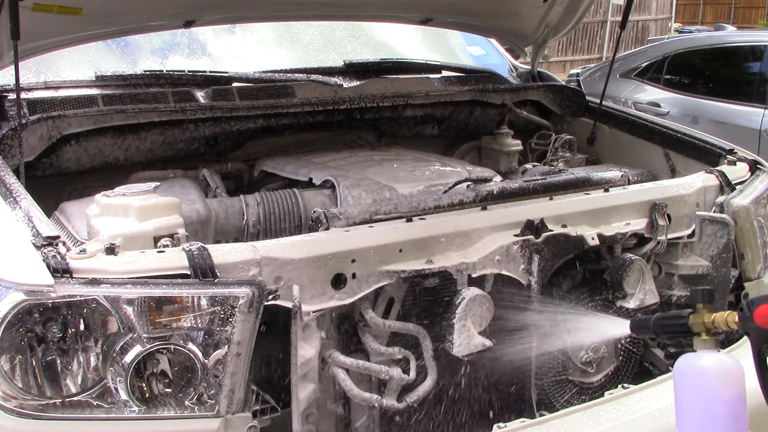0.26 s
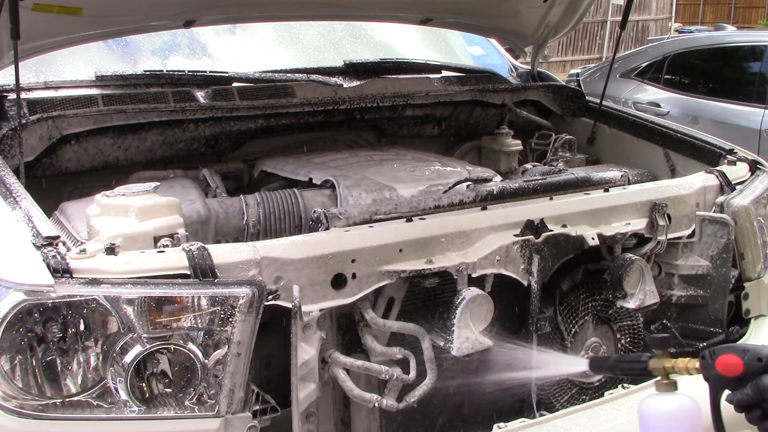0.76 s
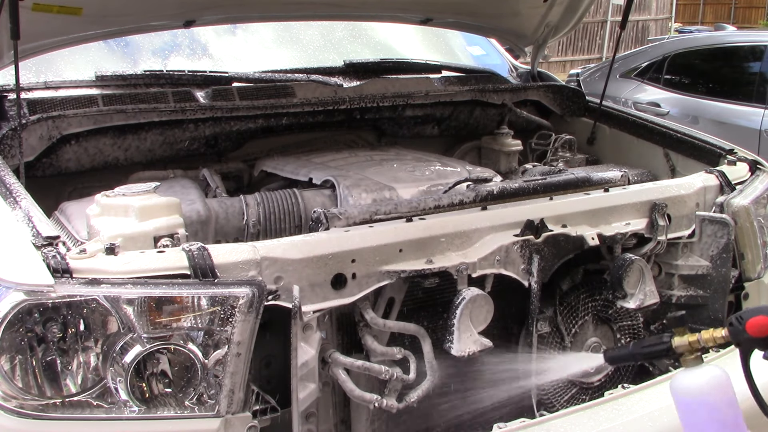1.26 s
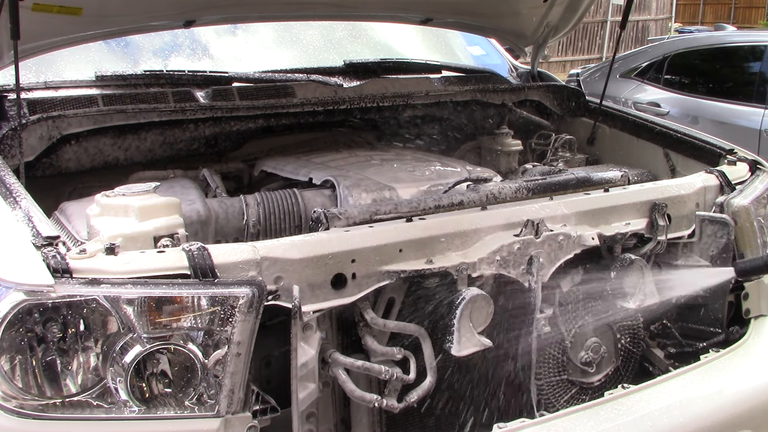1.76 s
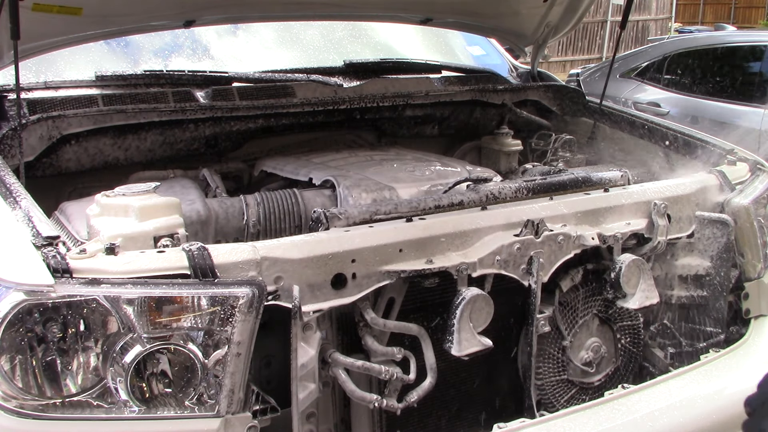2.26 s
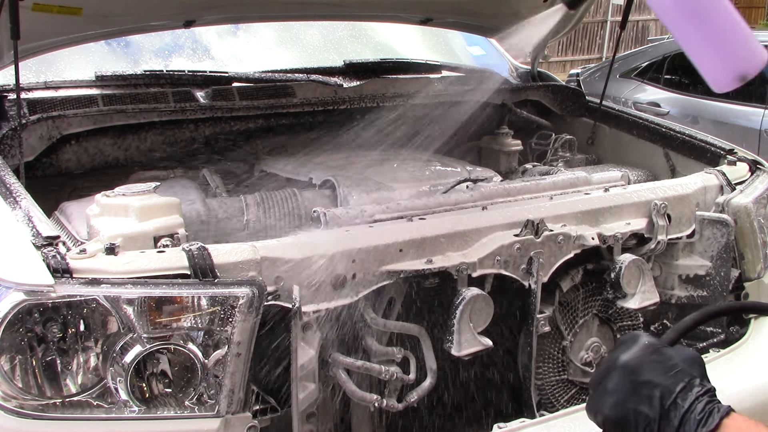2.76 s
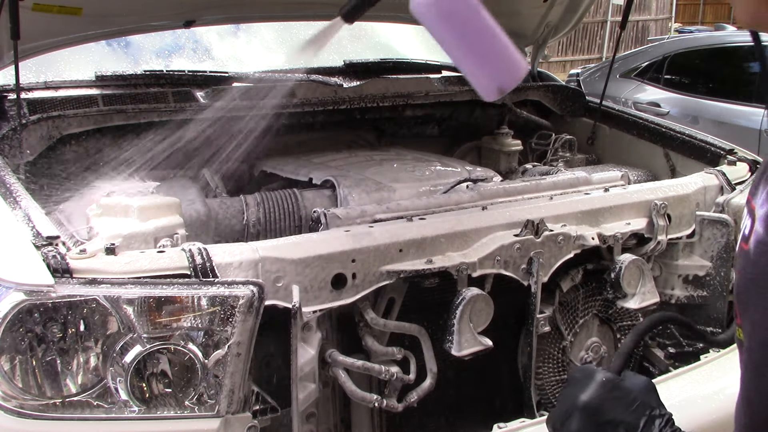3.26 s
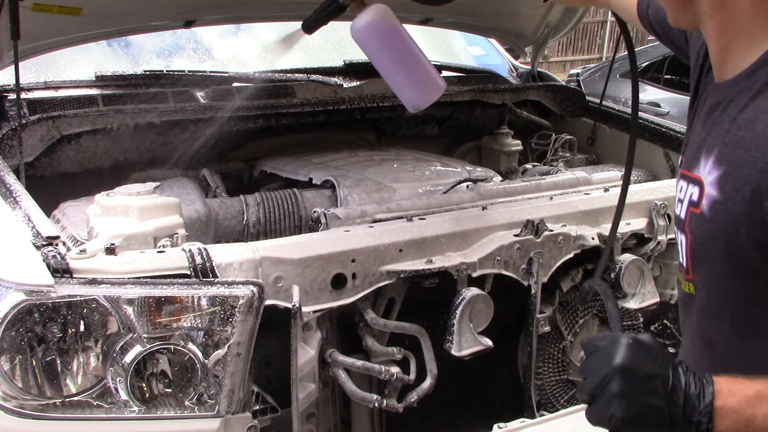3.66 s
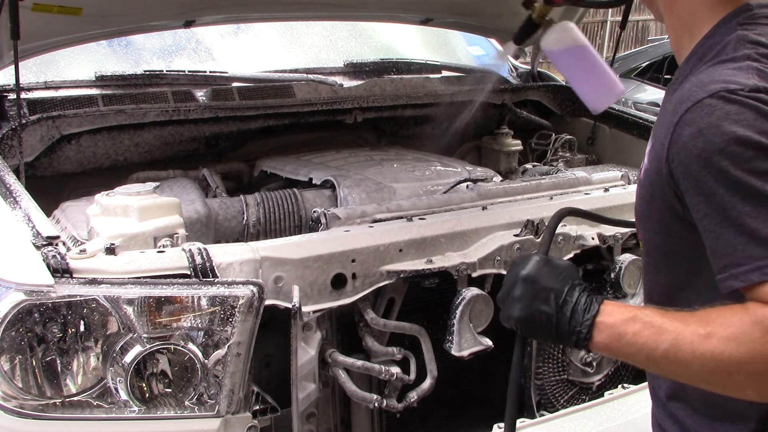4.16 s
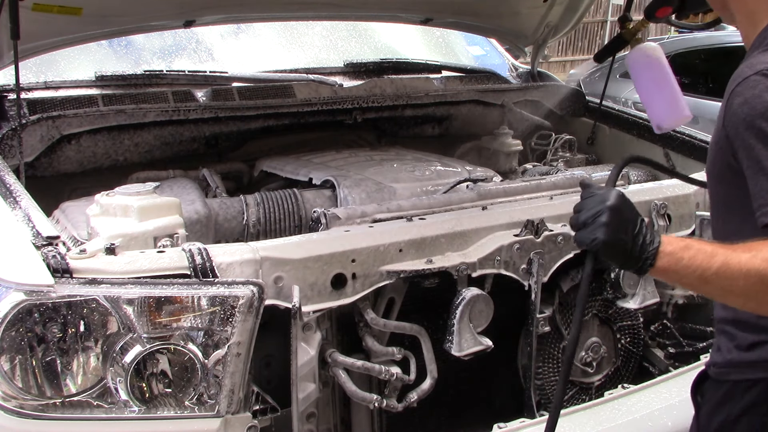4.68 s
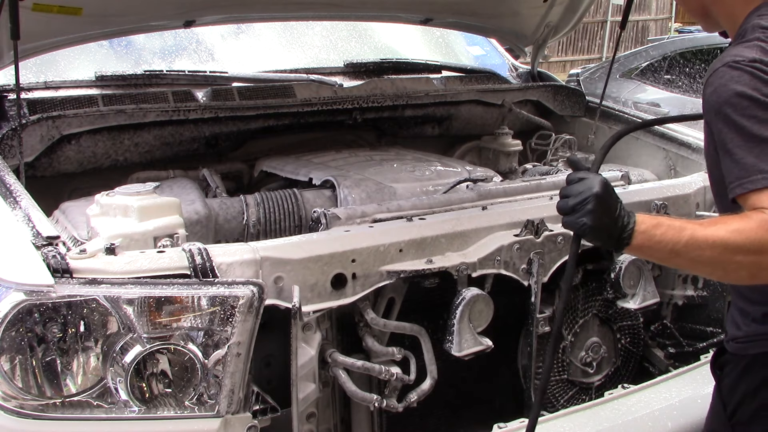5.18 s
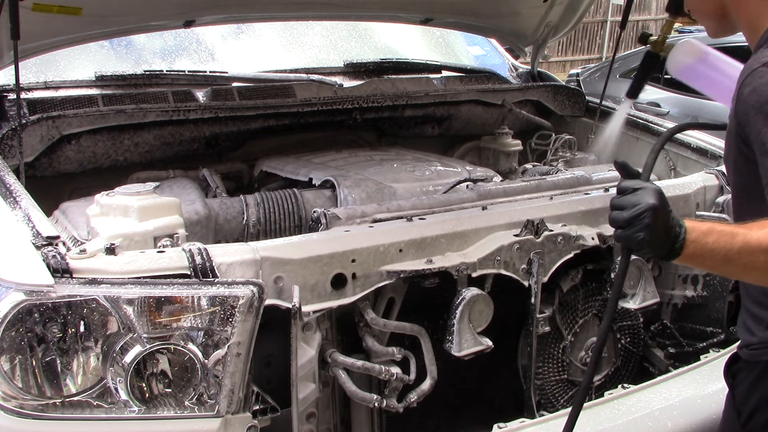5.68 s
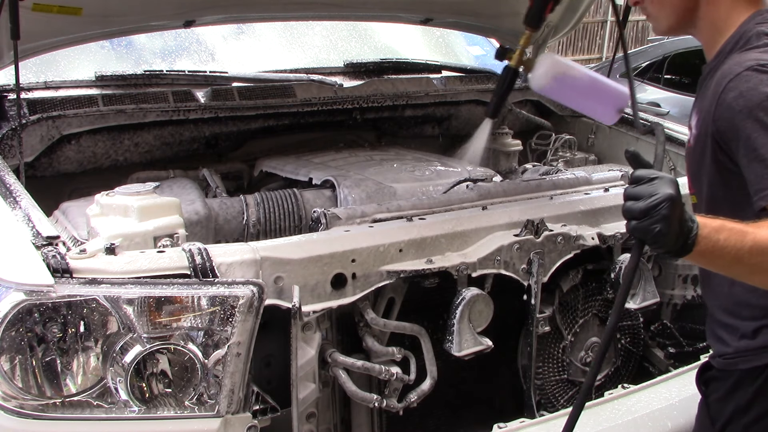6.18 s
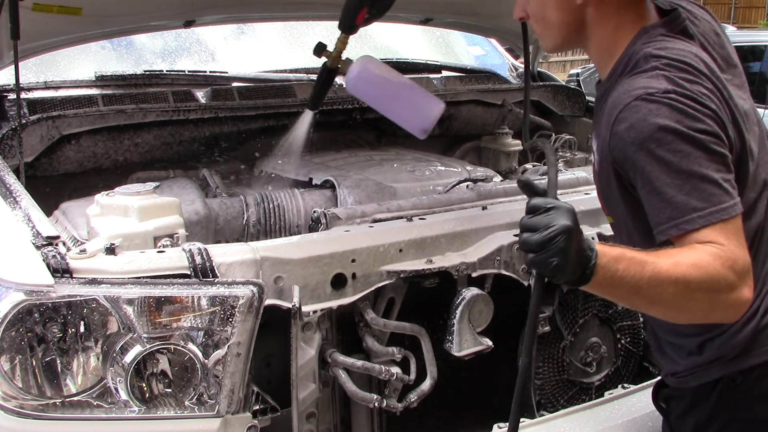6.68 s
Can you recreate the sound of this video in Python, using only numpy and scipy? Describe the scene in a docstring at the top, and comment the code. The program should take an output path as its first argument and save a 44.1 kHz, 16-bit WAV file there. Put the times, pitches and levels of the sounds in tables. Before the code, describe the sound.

A pressure washer sprays foam over a car engine bay, a continuous swishing hiss and spatter above a steady pump hum.

```python
"""A swishing, spattering roar of spray over a steady hum: a pressure washer foams a car's engine bay.
Air drawn into the foam nozzle roars in a resonance near 2 kHz, the fan of foam hisses, and drops spatter
whenever the jet strikes bare metal. Echoes from the bonnet and panels shift as the lance sweeps, so
the hiss swishes. Underneath, the pump hums and air and water rush. Outdoors, one close microphone."""
import sys
import numpy as np
from scipy import signal
from scipy.fft import rfft, irfft, next_fast_len
from scipy.io import wavfile
from scipy.ndimage import uniform_filter1d, minimum_filter1d, map_coordinates

SR = 44100
rng = np.random.default_rng(int(sys.argv[2]) if len(sys.argv) > 2 else 0)


def wav_out(sig):
    """Save sig, one row per channel (or a flat mono array), as 16-bit PCM at SR to the path in sys.argv[1]."""
    wavfile.write(sys.argv[1], SR, np.round(np.clip(np.atleast_2d(sig).T, -1, 1) * 32767).astype(np.int16))


N = 305613

# level ride of the foam fan: t/s, hollow ring under the bonnet/dB, hiss on the panels/dB
FAN_RIDE = [(0, -26, -20.5), (.6, -27.5, -20.5), (1.2, -28, -21), (1.6, -23.5, -18), (2, -25, -18.5),
            (2.45, -23, -23), (2.7, -21.5, -20), (3.2, -20.5, -22.5), (3.65, -20, -25.5), (4.2, -21.5, -26),
            (4.75, -22, -24.5), (5.2, -24.5, -27.5), (5.4, -21.5, -23), (6.15, -20, -22),
            (6.7, -22.5, -23.5), (6.93, -19, -25.5)]


def nozzle(sputter_db=0.5, core_width_hz=65, core_db=-3.5, surge_db=0.4, wander_hz=40, trim_db=-1):
    """Air and soap sputter through the nozzle: a broad roar whose narrow core wanders with the mixture."""
    # ride of the roar and its resonance: t/s, level/dB, f/Hz
    ride = [(0, -13, 2130), (.2, -14, 2060), (.58, -14.5, 2243), (1.05, -13.5, 2260), (1.55, -15, 2214),
            (2, -15.5, 2242), (2.65, -15, 2100), (3.15, -14.5, 2210), (3.65, -15, 2113), (4.3, -19, 2248),
            (4.84, -17, 2088), (5.1, -16.5, 2244), (5.8, -16.5, 2128), (6.15, -14.5, 2160),
            (6.35, -14.5, 2030), (6.93, -13, 2166)]
    # uneven foam chokes the nozzle for a moment: t/s, length/s, dip/dB
    chokes = [(0.115, 0.12, 2.5), (1.177, 0.092, 3), (1.425, .06, 5.5), (4.952, 0.026, 6), (5.29, 0.045, 5)]
    # colour of the broad roar: f/Hz, level/dB
    throat_colour = [(300, -90), (700, -39), (1200, -17.5), (1520, -14.5), (1800, -4.5), (2030, -0.5),
                     (2180, -0.5), (2350, 0), (2550, -5), (2900, -15), (3400, -54), (5000, -54)]
    roar_db, centre_hz = curves(ride)
    choke_db = sum(dip * passage(s, length) for s, length, dip in chokes)
    roar_db = roar_db + surge_db * wobble(24) - choke_db
    phase = 2 * np.pi * np.cumsum(centre_hz + wander_hz * wobble(15)) / SR
    eddies = [filtered(rng.standard_normal(N), lambda hz: ring(hz, core_width_hz)) for _ in range(2)]
    core = unit(eddies[0] * np.cos(phase) + eddies[1] * np.sin(phase))
    roar = patchy(noise(throat_colour), depth_db=2.0, size=(2, 11)) + amp(core_db) * core
    return amp(roar_db + trim_db) * unit(roar * amp(sputter_db * wobble(130)))


def foam_fan(flutter_db=0.96, sway_db=0.64, stray_splash_db=-29.5):
    """The sheet of foam breaks up and hisses, rings hollow under the bonnet and splashes on edges."""
    # colours of the three layers: f/Hz, level/dB
    hollow_colour = [(500, -90), (2500, -39), (3300, -21), (3650, -1.5), (4000, 3), (4500, 0.5), (5200, 1),
                     (5900, -4), (7000, -30), (10000, -40)]
    hiss_colour = [(150, -59), (1000, -8), (2600, 3.5), (3400, -15), (4400, -18), (5300, 4.5), (6300, 6.5),
                   (7500, 3), (8500, -2), (10000, -10), (15000, -25)]
    splash_colour = [(400, -44), (1500, -4.5), (2500, 4), (2950, 6), (3400, 5.5), (3900, 1), (5000, -35),
                     (9000, -50)]
    # the jet splashes over a close edge: t/s, length/s, level/dB
    edges = [(.05, 0.11, -33), (.31, 0.23, -27), (.55, .14, -28), (.91, 0.061, -25), (1.16, 0.035, -39),
             (1.52, .04, -32), (1.68, 0.078, -24), (2.015, 0.035, -23), (2.4, .2, -34), (3.045, 0.039, -21),
             (3.91, 0.042, -30), (4.85, 0.28, -26.5), (5.68, .08, -39), (6.3, 0.14, -28),
             (6.71, 0.066, -26)]
    hollow_db, hiss_db = curves(FAN_RIDE)
    hollow = amp(hollow_db + sway_db * wobble(18)) * noise(hollow_colour)
    hiss = amp(hiss_db + sway_db * wobble(18)) * noise(hiss_colour)
    # the rim of the fan always catches some edge
    splash = np.hypot(amp(stray_splash_db), passages(edges)) * noise(splash_colour)
    sheet = patchy(hollow + hiss + splash, depth_db=2.2, size=(3, 13))
    return sheet * amp(flutter_db * wobble(70))


def drops(clump_db=0.55, sway_db=0.77, stray_spatter_db=-27, fizz_re_strike_db=-9):
    """Foam fizzes where it lands; on bare metal, harder drops spatter and throw up more fizz."""
    # foam landing on the engine: t/s, level/dB
    fizz_ride = [(0, -25), (.4, -28.5), (.7, -31), (1.5, -31), (1.68, -22), (1.85, -27), (2.3, -24.5),
                 (2.55, -21.5), (3.05, -23.5), (3.6, -28.5), (3.95, -22.5), (4.35, -24), (4.8, -23.5),
                 (5.45, -25.5), (5.62, -27), (6.2, -21), (6.48, -26), (6.93, -22)]
    # the jet strikes bare metal: t/s, length/s, level/dB
    strikes = [(.08, 0.16, -25), (.245, .07, -20), (.39, 0.036, -24), (.48, .1, -22.5), (.78, .08, -24),
               (.91, 0.05, -23), (1.16, 0.031, -23), (1.3, .06, -23), (1.64, 0.047, -20), (1.735, .09, -21),
               (1.97, 0.14, -19), (2.09, 0.08, -25), (2.25, .07, -21), (2.43, .07, -37), (3.02, .13, -20),
               (3.275, 0.054, -19), (3.4, 0.039, -34), (3.87, .1, -30), (4.06, .13, -25),
               (4.61, 0.029, -27), (4.83, 0.17, -24.5), (5.13, 0.12, -25), (5.33, .1, -25),
               (5.48, 0.095, -29), (5.76, 0.054, -22), (6.03, 0.072, -22), (6.27, 0.049, -25),
               (6.62, 0.079, -20), (6.77, .12, -18.5)]
    # colours of the fine fizz and the hard spatter: f/Hz, level/dB
    fizz_colour = [(500, -80), (5000, -39), (8000, -7), (9400, 0), (10800, 0), (12000, -3), (13500, -12),
                   (15800, -21)]
    spatter_colour = [(150, -69), (1000, -9.5), (3000, -4), (7000, 0.5), (12500, -3), (14000, -5.5),
                      (15800, -11)]
    fizz_db, = curves(fizz_ride)
    strike = passages(strikes)
    fizz_gain = np.hypot(amp(fizz_db), amp(fizz_re_strike_db) * strike)
    spatter_gain = np.hypot(amp(stray_spatter_db), strike)  # some drops always miss the foam
    fizz = fizz_gain * coloured(impacts(per_second=10000, spread_db=0.5), fizz_colour)
    spatter = spatter_gain * coloured(impacts(per_second=6000, spread_db=-1.0), spatter_colour)
    return patchy(fizz + spatter, depth_db=1.4) * amp(clump_db * wobble(60) + sway_db * wobble(14))


def impacts(per_second, spread_db):
    """Tiny drops of many sizes land at random, one click each."""
    landed = rng.random(N) < per_second / SR
    size = amp(spread_db * np.minimum(rng.standard_normal(N), 2))
    return unit(landed * rng.uniform(-0.78, 1, N) * size)


def flares(width_share=0.022, steadiness=0.42):
    """As the jet sweeps over gaps and edges, narrow whistles swell out of the hiss and fade again."""
    # the prominent whistles: t/s, f/Hz, level/dB, length/s
    cues = [(0.205, 2050, -21.5, 0.082), (.33, 3330, -28, 0.075), (0.559, 2280, -14, 0.067),
            (.78, 6160, -28, .07), (1.03, 6050, -23, .06), (1.054, 2258, -12.5, 0.068),
            (1.328, 6850, -24, .05), (1.369, 2190, -19.5, 0.053), (1.559, 2250, -14.5, .05),
            (1.615, 2230, -15, 0.034), (1.832, 2290, -17, .06), (2.114, 2240, -16, 0.087),
            (2.658, 2063, -17.5, .2), (3.112, 2316, -14, .035), (3.202, 3740, -22, 0.063),
            (3.205, 2192, -14, 0.028), (3.33, 4140, -24, 0.05), (3.78, 2161, -16.5, 0.081),
            (4.166, 4090, -24, .14), (4.198, 2306, -19, 0.12), (4.425, 2290, -24, .071),
            (4.83, 2030, -21, 0.14), (4.861, 2920, -27.5, .1), (4.952, 3600, -28, 0.084),
            (5.597, 4010, -24, 0.098), (5.755, 2098, -15, 0.092), (6.279, 5490, -22.5, 0.15),
            (6.322, 2016, -13, 0.14), (6.827, 4600, -20, 0.038), (6.877, 2245, -12.5, 0.037),
            (6.912, 3675, -22.5, 0.1)]
    out = np.zeros(N + SR)
    t = np.arange(-SR // 4, SR // 4) / SR
    coarse = np.linspace(t[0], t[-1], 2048)
    offset_hz = np.fft.fftfreq(len(coarse), coarse[1] - coarse[0])
    taper = signal.windows.tukey(len(coarse))
    for s, hz, db, length in cues + lesser_flares():
        eddies = rng.standard_normal(len(coarse)) + 1j * rng.standard_normal(len(coarse))
        drive = np.fft.ifft(eddies * ring(offset_hz, width_share * hz))
        drive /= np.abs(drive) ** steadiness  # the whistle saturates, which steadies its level
        swell = taper * 2 ** (-2 * (coarse / length) ** 2)  # half power at both ends of its length
        drive *= amp(db) * swell / np.sqrt(np.mean(np.abs(drive) ** 2) / 2)
        whistle = np.real(np.interp(t, coarse, drive) * np.exp(2j * np.pi * hz * t))
        out[max(round(s * SR), 0):][:len(t)] += whistle
    return out[SR // 4:][:N]


def lesser_flares(per_second=8.3, low_hz=3750, high_hz=5735, re_fan_db=-9.5, length_s=0.073):
    """Cues for faint random whistles that follow the fan's level: t/s, f/Hz, level/dB, length/s."""
    times, hollow_db, hiss_db = np.transpose(FAN_RIDE)
    when, pitch, stretch = rng.random((round(per_second * N / SR), 3)).T
    s = when * N / SR
    hz = low_hz * (high_hz / low_hz) ** pitch
    is_low = hz < (low_hz + high_hz) / 2
    fan_db = np.where(is_low, np.interp(s, times, hollow_db), np.interp(s, times, hiss_db))
    return list(zip(s, hz, fan_db + re_fan_db, length_s * (.5 + stretch)))


def radiator_fins(flutter_db=.8):
    """Thin metal fins slice the jet into a bright, spitting sizzle."""
    # the jet rakes the fins: t/s, length/s, level/dB
    rakes = [(.25, .08, -27), (.49, .1, -25), (.79, 0.097, -26), (1.16, .04, -26), (1.33, 0.08, -23),
             (1.66, 0.26, -24), (1.98, .2, -24)]
    # colour of the sizzle: f/Hz, level/dB
    sizzle_colour = [(2000, -60), (5000, -14), (6300, -1), (7200, -3), (8500, 3), (10500, -18),
                     (15000, -40)]
    return passages(rakes) * patchy(noise(sizzle_colour), depth_db=3.5) * amp(flutter_db * wobble(70))


def moving_echoes(x, echo, nearest_s, farthest_s, sweep_s=0.000242, count=4):
    """Echo paths off nearby surfaces change as the lance moves, sliding ripples through the spray."""
    heard, now = x.copy(), np.arange(N)
    for delay in np.geomspace(nearest_s, farthest_s, count):
        lag = SR * (delay + sweep_s * wobble(3))
        heard += echo * np.interp(now - lag, now, x, left=0)
    return heard / np.sqrt(1 + count * echo ** 2)


def panel_notch(x, width_hz=180):
    """The echo off the nearest panel cancels one band of the spray, which slides as the lance moves."""
    # path of the notch: t/s, f/Hz, depth/dB (negative lifts the band)
    sweep = [(0, 4100, 7), (.7, 4330, 2), (1.2, 3900, -1), (1.9, 3760, 5.5), (2.7, 3407, 1.5),
             (3.6, 3360, 3.5), (4.4, 3420, 4), (4.85, 3803, 16), (5.15, 4400, 0), (5.3, 3438, 0),
             (6.93, 3250, -1)]
    hz, s, bands = signal.stft(x, SR, nperseg=512)
    times, centre_hz, depth_db = np.transpose(sweep)
    nearness = np.exp(-((hz[:, None] - np.interp(s, times, centre_hz)) / width_hz) ** 2)
    cut_db = np.interp(s, times, depth_db) * nearness
    return signal.istft(bands * amp(-cut_db), SR, nperseg=512)[1][:N]


def pump(shaft_hz=56.705, drift_hz=0.016, shake_turns=0.0011, waver_db=0.18):
    """The pump hums in harmonics of its motor shaft, which shakes a little under the load."""
    # partials of the hum: multiple of the shaft speed, level/dB
    partials = [(3, -54.5), (5, -60.5), (6, -47), (7, -40.6), (8, -59), (9, -40), (10, -23), (11, -32.5),
                (12, -48.1), (13, -43.5), (14, -46.5), (15, -38.5), (16, -44), (17, -41), (18, -36),
                (19, -53), (20, -37), (21, -50), (22, -33.5), (23, -37), (24, -61), (25, -41), (28, -40),
                (29, -44.1), (30, -37)]
    # how much hum reaches the microphone: t/s, gain/dB
    ride = [(0, -1.5), (.8, -2.5), (1.75, 0.5), (3.26, 0.7), (3.88, 0), (4.57, 0.9), (5.9, 2.6),
            (6.93, -0.2)]
    reach_db, = curves(ride)
    turns = np.cumsum(shaft_hz + drift_hz * wobble(3.09)) / SR + shake_turns * wobble(24)
    wavers = [amp(waver_db * wobble(12)) for _ in range(5)]
    hum = np.zeros(N)
    for order, db in partials:
        # the housing smears each stroke over the whole turn, so the pump hums and does not knock
        smear = .19 * order ** 2
        hum += amp(db) * wavers[order % len(wavers)] * np.sin(2 * np.pi * (order * turns - smear))
    return hum * amp(reach_db)


def drumming_and_rush(drum_sway_db=1.4, rush_sway_db=1.7):
    """Sheet metal and plastic drum under the spray; water and the pump's cooling air add a dull rush."""
    # ride of the two beds: t/s, drumming/dB, rush/dB
    ride = [(0, -37, -32), (.95, -32, -39), (1.85, -34, -32), (2.25, -44, -34), (2.9, -37.5, -30.5),
            (3.5, -41, -33.5), (4, -39, -31.5), (4.9, -39.5, -30.5), (5.5, -44.5, -30.5), (6.2, -32, -28),
            (6.45, -37.5, -33), (6.93, -39, -30)]
    # their colours: f/Hz, level/dB
    drum_colour = [(60, -75), (200, -38), (320, -24), (410, -15.5), (460, -5.5), (505, 2), (560, -2),
                   (680, -12), (1200, -51)]
    rush_colour = [(20, -64), (90, -44), (200, -28), (300, -19.5), (370, -11.5), (500, -7), (620, -2.7),
                   (780, -7), (1050, -6.5), (1400, -5), (2200, -15.1), (5000, -60)]
    drum_db, rush_db = curves(ride)
    drumming = amp(drum_db + drum_sway_db * wobble(10)) * noise(drum_colour)
    rush = amp(rush_db + rush_sway_db * wobble(11)) * noise(rush_colour)
    return drumming + rush


def low_rumble(bump_db=6):
    """A very faint low rumble swells in irregular bumps."""
    # level of the rumble: t/s, level/dB
    ride = [(0, -70), (1.4, -74), (2.4, -71), (3.2, -67), (4, -81), (5.3, -80), (6.2, -68), (6.93, -73)]
    # colour of the rumble: f/Hz, level/dB
    rumble_colour = [(15, -8), (60, 2), (110, 0), (200, -15), (500, -52)]
    rumble_db, = curves(ride)
    return amp(rumble_db) * unit(noise(rumble_colour) * amp(bump_db * wobble(16)))


def patchy(x, depth_db, size=(4, 15)):
    """Patches of the spray swell and fade on their own; size is their extent in (bands, frames)."""
    bands = signal.stft(x, nperseg=512)[2]
    field = rng.standard_normal(bands.shape)
    for axis in (0, 1, 0, 1):
        field = uniform_filter1d(field, size[axis], axis)
    gain = unit(amp(depth_db * unit(field)))
    return signal.istft(bands * gain, nperseg=512)[1][:N]


def passage(s, length, crossing_s=0.032):
    """Envelope of the jet moving onto a part, staying for its length around time s, and moving off."""
    inside_s = length / 2 - np.abs(np.arange(N) / SR - s)
    return np.clip(.5 + inside_s / crossing_s, 0, 1)


def passages(rows):
    """Summed envelope of passages given as t/s, length/s, level/dB."""
    return sum(amp(db) * passage(s, length) for s, length, db in rows)


def ring(offset_hz, width_hz, skirt_hz=800):
    """Gain of a narrow resonance at a distance from its centre."""
    return np.exp(-(offset_hz / skirt_hz) ** 2) / (1 + (offset_hz / width_hz) ** 2)


def noise(colour):
    """Noise of the given colour."""
    return coloured(rng.standard_normal(N), colour)


def coloured(x, colour):
    """x through an EQ curve (f/Hz, level/dB), brought to rms 1."""
    f, db = np.transpose(colour)
    return unit(filtered(x, lambda hz: amp(np.interp(np.log(hz + 1), np.log(f), db))))


def filtered(x, response):
    """x through a filter whose gain at each frequency is response(hz)."""
    padded = next_fast_len(N + SR // 4)
    return irfft(rfft(x, padded) * response(np.fft.rfftfreq(padded, 1 / SR)), padded)[:N]


def wobble(rate):
    """A smooth random curve, rate knots a second."""
    knots = rng.standard_normal(int(N * rate / SR) + 4)
    coarse = np.arange(0, N, 64)
    return np.interp(np.arange(N), coarse, map_coordinates(knots, [coarse * rate / SR]))


def curves(rows):
    """One value per sample for each column after the time."""
    s, *columns = np.transpose(rows)
    return [np.interp(np.arange(N) / SR, s, column) for column in columns]


def amp(db):
    """Decibels to gain."""
    return 10 ** (np.asarray(db) / 20)


def unit(x):
    """x at rms 1."""
    return x / np.sqrt(np.mean(x ** 2) + 1e-20)


def scene():
    """The swishing spray over the pump and the low beds, the same in both channels."""
    # the roar comes back off bonnet, ground and fence, the hiss off parts of the engine bay
    roar = moving_echoes(nozzle(), echo=0.3, nearest_s=.007, farthest_s=.019, count=3)
    hiss = moving_echoes(foam_fan(), echo=0.29, nearest_s=.0024, farthest_s=.009)
    spray = panel_notch(roar + hiss + radiator_fins() + drops())
    mono = spray + drumming_and_rush() + pump() + low_rumble() + flares()
    return np.array([mono, mono])


def record(dry, ceiling=0.92, ramp_samples=150, top_hz=15780):
    """A limiter ducks the highest peaks, then a steep low-pass cuts the very top."""
    needed = np.minimum(1, ceiling / (np.abs(dry).max(axis=0) + 1e-9))
    gain = uniform_filter1d(minimum_filter1d(needed, 2 * ramp_samples), ramp_samples)
    return np.array([filtered(channel * gain, lambda hz: hz < top_hz) for channel in dry])


dry = scene()
out = record(dry)
wav_out(out)
```